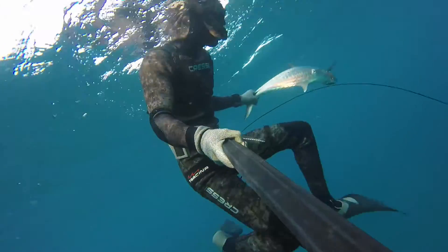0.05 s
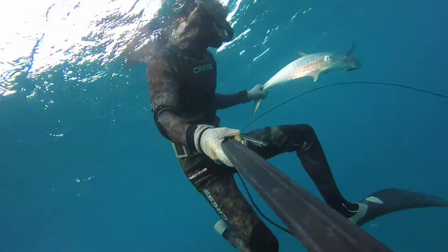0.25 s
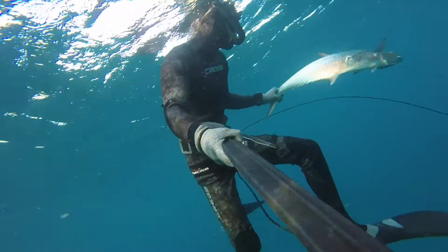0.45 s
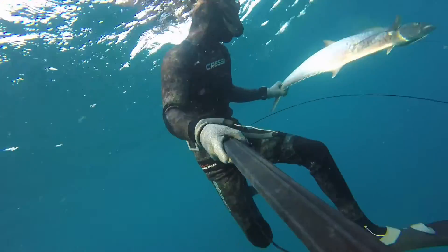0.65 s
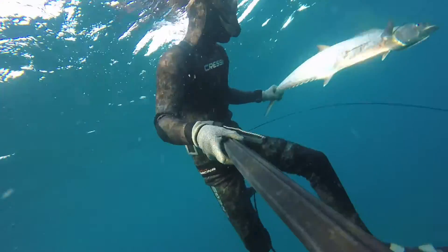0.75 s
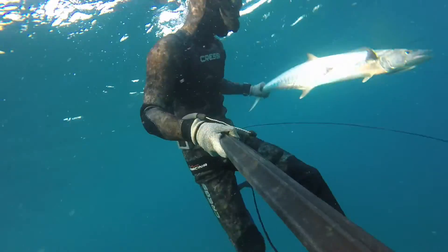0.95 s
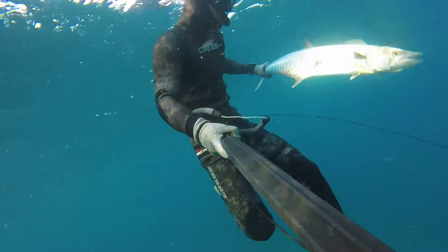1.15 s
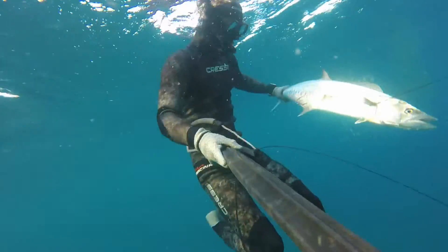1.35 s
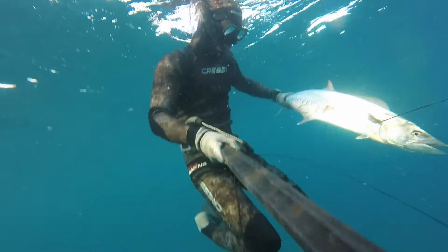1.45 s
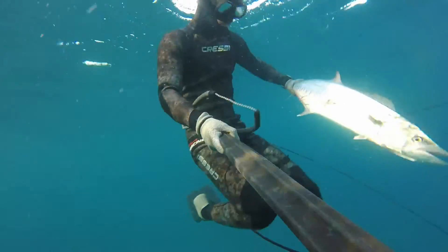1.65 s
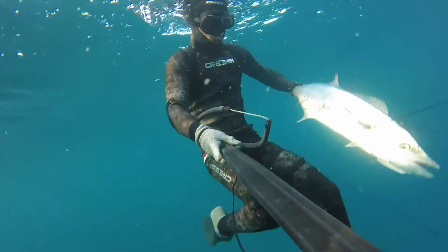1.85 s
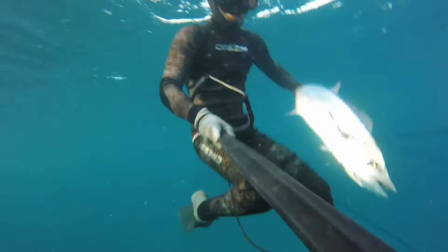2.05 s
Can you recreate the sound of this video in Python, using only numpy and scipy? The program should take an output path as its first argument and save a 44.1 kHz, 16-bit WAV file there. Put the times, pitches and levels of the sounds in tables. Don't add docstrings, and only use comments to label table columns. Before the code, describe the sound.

Muffled speargun handling underwater, picked up inside a plastic housing on the gun. A soft low hum, bumps, tiny ticks and a brief bubble open it; faint clicks continue until a soft bump at 0.85 s. A very loud, overloaded thump with a sharp clack hits at 1.0 s. Low booming knocks cluster from 1.36 to 1.65 s with glove rubbing, then subside to ticks and faint watery hiss until 2.1 s.

```python
import sys
import numpy as np
from scipy import signal
from scipy.fft import rfft, irfft, next_fast_len
from scipy.io import wavfile
from scipy.ndimage import map_coordinates

SR = 44100
rng = np.random.default_rng(int(sys.argv[2]) if len(sys.argv) > 2 else 0)


def waveform_to_disk(signal):
    frames = np.transpose(np.atleast_2d(signal))
    scaled = np.clip(frames, -1, 1) * 32767
    samples = np.round(scaled).astype(np.int16)
    wavfile.write(sys.argv[1], SR, samples)


def voltage_ratio(level):
    return 10 ** (np.asarray(level, float) / 20)


N = 92301


def unit(x):
    return x / np.sqrt(np.mean(x ** 2) + 1e-20)


def along(points, f):
    hz, db = np.transpose(points)
    return np.interp(np.log(f + 1), np.log(hz + 1), db, -120, -120)


def level_curve(points):
    s, db = np.transpose(points)
    return np.interp(np.arange(N) / SR, s, db)


def wobble(rate):
    knots = rng.standard_normal(int(N * rate / SR) + 4)
    return map_coordinates(knots, [np.arange(N) * rate / SR])


def filtered(x, response):
    size = next_fast_len(len(x) + 8192)
    return irfft(rfft(x, size) * response(np.fft.rfftfreq(size, 1 / SR)), size)[:len(x)]


def resonance(f, hz, width):
    return 1j * f * width / (hz * hz - f * f + 1j * f * width)


def favour(hz, centre_hz, spread_oct):
    return np.exp(-.5 * (np.log2(hz / centre_hz) / spread_oct) ** 2)


def add(track, s, sound):
    part = track[round(s * SR):][:len(sound)]
    part += sound[:len(part)]


# f/Hz, level/dB, T60/s
BARREL_MODES = [(77.56, 7.5, 0.22), (102.9, 12.5, 0.092), (138.2, 4, 0.16), (164.4, 0.5, 0.15),
                (191.6, -6.5, 0.18), (250, -64, .06), (385, 4, 0.074)]
# t/s, level/dB, direction, contact/ms, favoured f/Hz
JOLTS = [(.028, -21, 0.79, 3.8, 200), (0.445, -24.5, -0.83, 2.7, 250), (0.852, -16, -0.61, 6.4, 162),
         (0.966, -25.5, -1.83, 5.5, 120), (0.993, -23, 1, 3.2, 150), (1.007, 5.5, -0.57, 2.78, 102),
         (1.356, -11, 0.6, 7.5, 110), (1.37, -12, -1.11, 5, 130), (1.388, -1, 0.77, 3.7, 150),
         (1.414, -15, 1, 18, 90), (1.465, -9, 0.96, 4.75, 120), (1.518, -27, 0.35, 5, 100),
         (1.538, -12.5, -0.58, 6.5, 130), (1.58, -8.5, 0.72, 4.2, 142), (1.605, -17, 1, 5.1, 90),
         (1.617, -11, 0.46, 6.1, 110), (1.642, 2.5, -0.39, 4.45, 80), (1.697, -19.5, 0.26, 6.8, 91),
         (1.886, -32, -0.97, 2.9, 182), (1.908, -34.5, -1, 4, 180), (2, -28.5, 0.72, 5.2, 139)]
JOLT_SPREAD_OCT, MODE_SCATTER_DB = 1.2, 2


def barrel_jolts():
    out, t = np.zeros(N), np.arange(SR // 2) / SR
    for s, db, direction, contact_ms, near_hz in JOLTS:
        scatter = rng.normal(0, MODE_SCATTER_DB, len(BARREL_MODES))
        modes = np.zeros(len(t))
        for (hz, level, t60), extra_db in zip(BARREL_MODES, scatter):
            decay = voltage_ratio(level + extra_db - 60 * t / t60)
            modes += decay * favour(hz, near_hz, JOLT_SPREAD_OCT) * np.cos(2 * np.pi * hz * t)
        push = np.hanning(max(int(contact_ms * SR / 1000), 8))
        knock = signal.fftconvolve(modes, push)[:len(t)]
        add(out, s, direction * voltage_ratio(db) * knock / np.abs(knock).max())
    return out


# t/s, level/dB, direction, f/Hz, T60/s
SWAYS = [
    (0.166, -18, 0.7, 22.9, 0.5),
    (0.421, -21.5, 1, 32.4, 0.17),
    (1.011, -2.5, 0.99, 28.57, .3),
    (1.128, -20.5, -0.95, 22.17, 0.92),
    (1.394, 1, -0.8, 32.4, 0.13),
    (1.47, -8.5, -0.59, 26.7, 0.19),
    (1.648, -5, 1, 28, .2),
    (1.715, -18.5, 0.88, 23.47, 0.61),
    (1.921, -19.5, 0.85, 29.7, 0.41),
]
SWAY_RISE_S = 0.001


def gun_sways():
    out, t = np.zeros(N), np.arange(SR // 2) / SR
    onset = 1 - np.exp(-t / SWAY_RISE_S)
    for s, db, direction, hz, t60 in SWAYS:
        add(out, s, direction * voltage_ratio(db - 60 * t / t60) * np.sin(2 * np.pi * hz * t) * onset)
    return out


# f/Hz, width/Hz, level/dB
HOUSING = [(602, 430, -11), (1020, 299, 3), (1670, 272, 1), (2450, 194, 0.5), (3065, 230, -1.5),
           (3900, 1500, -7.5), (5800, 1020, -11), (8080, 1830, -9), (10660, 5500, -19.5)]
TOP_FROM_HZ, DULL_OVER = 4500, 1.575


def shell_modes():
    return [(hz, width, (-1) ** k * voltage_ratio(db)) for k, (hz, width, db) in enumerate(HOUSING)]


def housing(f):
    return sum(gain * resonance(f, hz, width) for hz, width, gain in shell_modes())


def struck_housing(f, centre_hz, top_db, spread_oct):
    body, top = 0, 0
    for hz, width, gain in shell_modes():
        mode = gain * resonance(f, hz, width)
        body = body + mode * favour(hz, centre_hz, spread_oct)
        top = top + mode * (hz > TOP_FROM_HZ) * voltage_ratio(top_db)
    u = f / (DULL_OVER * centre_hz)
    return body / (1 - u * u + 1.4j * u) ** 2 + top


SCRAPE_RISE_S, SNAP = 0.00074, 1.2


def contact(db, centre_hz, t60, top_db, spread_oct):
    t = np.arange(SR // 8) / SR
    scrape = rng.standard_normal(len(t)) * voltage_ratio(-60 * t / t60) * (1 - np.exp(-t / SCRAPE_RISE_S))
    scrape[round(SCRAPE_RISE_S * SR)] += SNAP
    ring = filtered(scrape, lambda f: struck_housing(f, centre_hz, top_db, spread_oct))
    return voltage_ratio(db) * ring / np.abs(ring).max()


# t/s, level/dB, centre f/Hz, scrape T60/s, sharp top level/dB
KNOCKS = [(.446, -27.5, 1260, 0.022, -27), (.556, -34.5, 1140, 0.029, -40), (.709, -39, 1000, 0.007, -14),
          (1.0067, -13, 655, 0.0066, -61), (1.0099, -10.5, 2070, 0.0084, -9.5),
          (1.0115, -15, 4100, 0.018, -9), (1.035, -33.5, 1300, 0.018, -37), (1.388, -12, 1076, 0.012, -35),
          (1.391, -15, 2640, 0.012, -27), (1.4003, -27, 2170, 0.0078, -17),
          (1.442, -35.5, 1490, 0.011, -37), (1.465, -18, 1180, 0.01, -64), (1.539, -39.5, 1210, 0.039, -46),
          (1.58, -28.5, 1230, 0.057, -50), (1.605, -44, 1100, 0.034, -42), (1.631, -32, 1110, 0.045, -50),
          (1.642, -17, 1400, 0.0088, -31), (1.644, -24, 3200, 0.029, -9), (1.652, -26.5, 4800, 0.036, -33),
          (1.963, -23, 2980, 0.007, -10.5)]


def housing_knocks():
    out = np.zeros(N)
    for s, db, hz, t60, top_db in KNOCKS:
        add(out, s, contact(db, hz, t60, top_db, spread_oct=0.6))
    return out


# t/s, level/dB, centre f/Hz, sharp top level/dB
TICKS = [(.047, -31, 2950, -16), (0.145, -29.5, 2660, -40), (.153, -40, 2700, -13),
         (0.243, -42.5, 3200, -20), (.253, -37.5, 2500, -9.5), (.313, -37.5, 2450, -24),
         (.341, -37, 2870, -6.5), (0.366, -40.5, 2450, -11), (0.576, -45, 4000, 11),
         (.688, -38.5, 2370, -18), (0.989, -43, 3970, 5), (1.033, -36.5, 5800, -24),
         (1.049, -30, 3950, -9.5), (1.051, -36.5, 4840, -35), (1.111, -43, 2220, -7),
         (1.161, -39, 2670, -16), (1.218, -37.5, 2320, -15), (1.24, -40, 3450, -4.5),
         (1.701, -44, 3650, -16), (1.731, -42.5, 2970, -18.5), (1.758, -41.5, 2870, -16),
         (1.788, -40.5, 3460, 2.5), (1.88, -49, 8060, -12), (1.937, -44, 2480, -27),
         (1.975, -38, 2820, -13), (2.012, -40, 3230, -8.5), (2.077, -47, 8200, -7)]
TICK_T60_S = 0.011


def housing_ticks():
    out = np.zeros(N)
    for s, db, hz, top_db in TICKS:
        add(out, s, contact(db, hz, TICK_T60_S, top_db, spread_oct=0.38))
    return out


# t/s, length/s, level/dB, f/Hz
HUMS = [
    (0.035, 0.095, -16.5, 85.6),
    (0.868, 0.067, -28.5, 140.4),
    (1.543, .04, -31.5, 375.6),
]


def rubber_bands():
    out, t = np.zeros(N), np.arange(SR // 5) / SR
    for s, length, db, hz in HUMS:
        arch = np.sin(np.pi * np.clip(t / length, 0, 1) ** 0.54)
        swell = np.abs(arch) ** 1.28 * (t < length)
        phase = 2 * np.pi * hz * t + .5 * wobble(52)[:len(t)]
        add(out, s, voltage_ratio(db) * swell * np.sin(phase))
    return out


# t/s, level/dB
GRIP = [(0, -38.5), (.62, -39.5), (.8, -45), (.87, -36.5), (1.3, -39.5), (1.5, -27.5), (1.85, -46.5),
        (1.93, -38.5), (2.09, -40)]
# f/Hz, level/dB
RUB = [(30, 4.5), (75, 1), (140, -12.5), (190, -15.5), (400, -27.5), (800, -33)]
ROCK_DB, ROCK_HZ, ROCK_WIDTH_HZ = -38.5, 26, 14


def handling():
    friction = rng.standard_normal(N) * voltage_ratio(1.95 * wobble(19.7))
    rub = unit(filtered(friction, lambda f: voltage_ratio(along(RUB, f))))

    def rocking(f):
        return resonance(f, ROCK_HZ, ROCK_WIDTH_HZ) / (1 + (f / 45) ** 4)

    rock = unit(filtered(rng.standard_normal(N), rocking))
    return voltage_ratio(level_curve(GRIP)) * rub + voltage_ratio(ROCK_DB) * rock


# t/s, level/dB, f/Hz
BUBBLES = [
    (.057, -39, 1636),
    (0.06, -41, 1886),
    (0.486, -55.5, 1020),
]
BUBBLE_RISE, BUBBLE_T60_S = 0.13, 0.026


def bubbles():
    out, t = np.zeros(N), np.arange(SR // 10) / SR
    onset = 1 - np.exp(-t / 0.00084)
    for s, db, hz in BUBBLES:
        phase = 2 * np.pi * hz * (t + BUBBLE_RISE * t * t / BUBBLE_T60_S)
        add(out, s, voltage_ratio(db + 9 - 60 * t / BUBBLE_T60_S) * onset * np.sin(phase))
    return out


FIZZ_PER_S, FIZZ_SCATTER_DB = 300, 5
FIZZ_HZ, FIZZ_SPREAD, FIZZ_CYCLES = 4690, 0.674, 8.5


def fizz():
    draw, k = rng.random((1200, 2)), np.arange(256)
    gaps_s = -np.log(draw[:, 0] + 1e-9) / FIZZ_PER_S
    start = (np.cumsum(gaps_s) * SR).astype(int)[:, None]
    hz = FIZZ_HZ * np.exp(FIZZ_SPREAD * rng.standard_normal(len(draw)))
    hz = np.clip(hz, 600, 14000)[:, None]
    size = voltage_ratio(-FIZZ_SCATTER_DB * np.log(draw[:, 1:] + 0.0067))
    decay = np.exp(-3 * hz * k / SR / FIZZ_CYCLES)
    grains = size * np.sqrt(hz) * np.sin(2 * np.pi * hz * k / SR) * decay
    return np.bincount((start + k).ravel(), grains.ravel(), N)[:N]


# t/s, level/dB
WASH = [(0, -51.5), (.05, -57.5), (.75, -56), (.83, -59), (.87, -55.5), (1.7, -60), (1.87, -61),
        (1.94, -53), (2.09, -53)]
# f/Hz, level/dB
SEA = [(200, -17), (450, -9.5), (2000, -6.5), (3200, -7.5), (5000, -13.5), (9000, -15), (13500, -36.5),
       (16300, -45)]
PEAKY, FIZZ_DB, FAR_DB = .8, -6, -76.5


def sea_colour(f):
    return voltage_ratio(along(SEA, f)) * (1 - PEAKY + PEAKY * np.abs(housing(f)))


def far_colour(f):
    u = (f / TOP_FROM_HZ) ** 2
    return sea_colour(f) * u / (1 + u) * (1 + (f / 10500) ** 6)


def water():
    turbulence = rng.standard_normal(N) * voltage_ratio(wobble(40.73))
    drive = turbulence + voltage_ratio(FIZZ_DB) * unit(fizz())
    wash = unit(filtered(drive, sea_colour))
    far = unit(filtered(rng.standard_normal(N), far_colour))
    return voltage_ratio(level_curve(WASH)) * wash + voltage_ratio(FAR_DB) * far


def scene():
    gun = barrel_jolts() + gun_sways()
    shell = housing_knocks() + housing_ticks()
    mix = gun + shell + rubber_bands() + handling() + bubbles() + water()
    return mix[None]


def band_limit(x):
    return signal.sosfilt(signal.butter(12, 16360, fs=SR, output="sos"), x)


def record(dry):
    held = dry[0] / (1 + np.abs(dry[0]) ** 14) ** (1 / 14)
    mic_top_hz = 15000
    finished = filtered(held, lambda f: 1 / (1 + (f / mic_top_hz) ** 24))
    return band_limit(finished[None])


dry = scene()
out = record(dry)
waveform_to_disk(out)
```